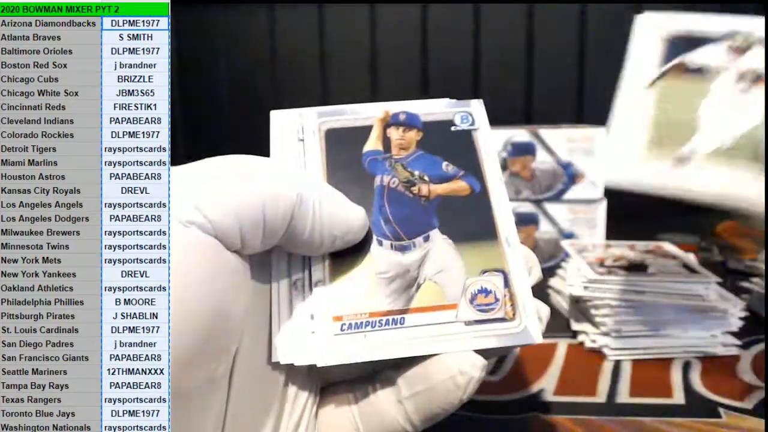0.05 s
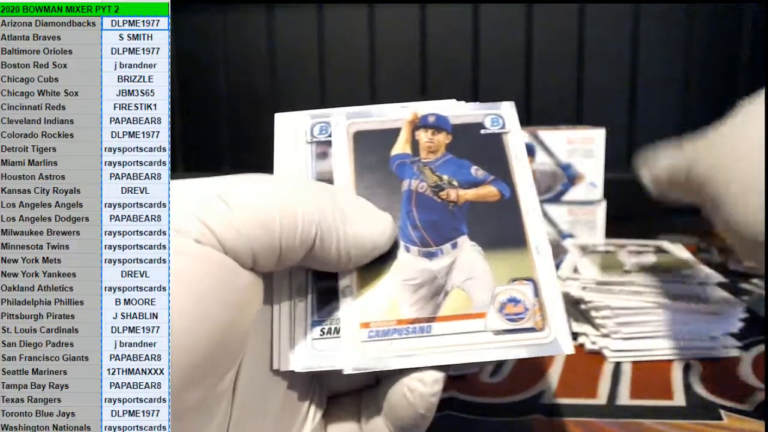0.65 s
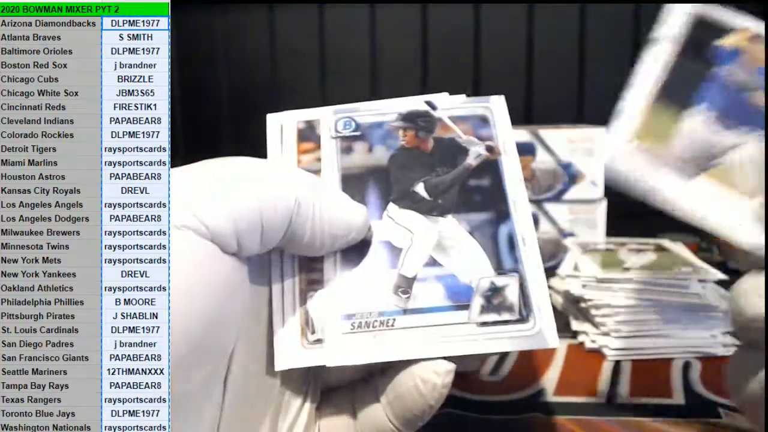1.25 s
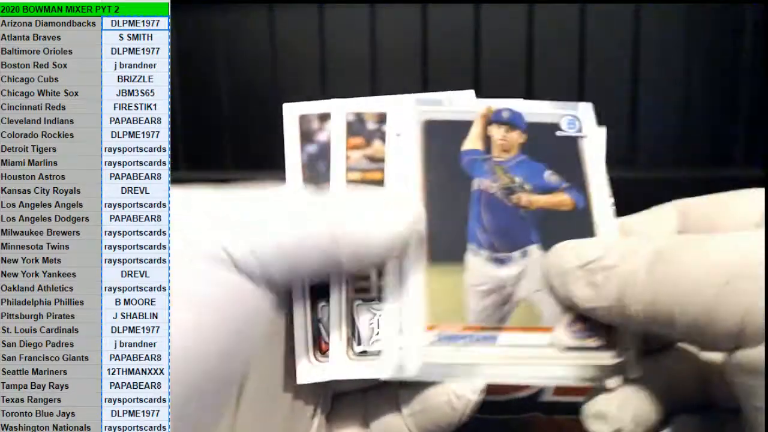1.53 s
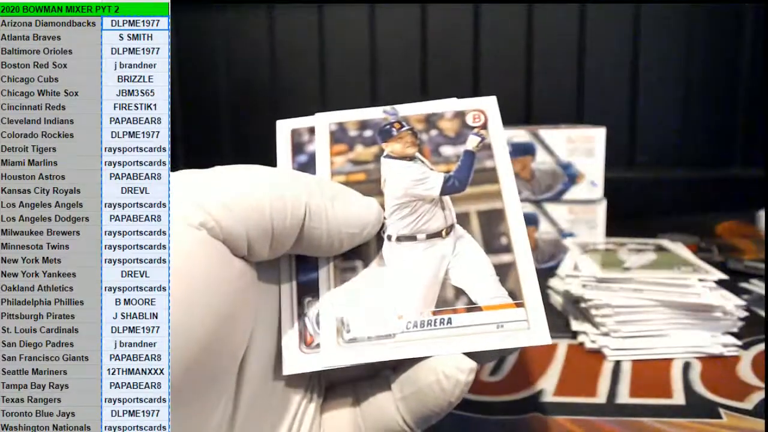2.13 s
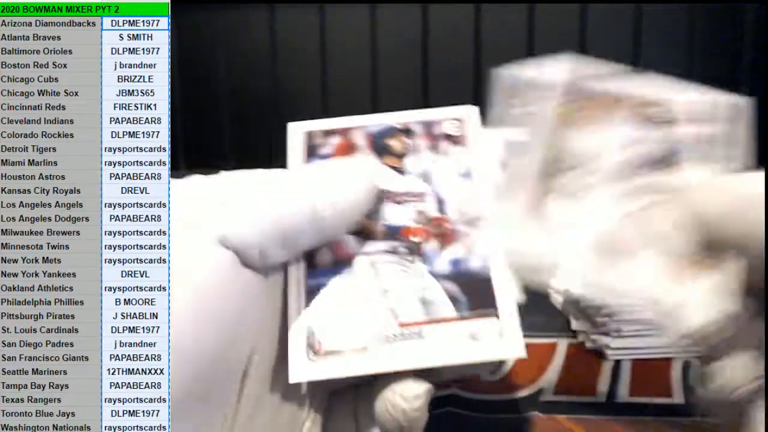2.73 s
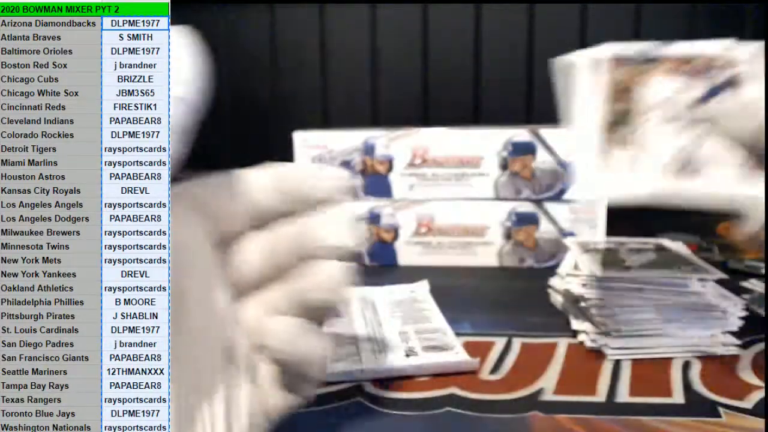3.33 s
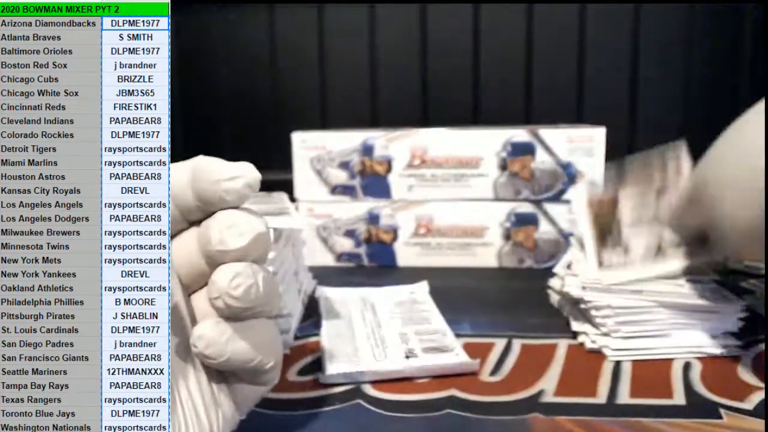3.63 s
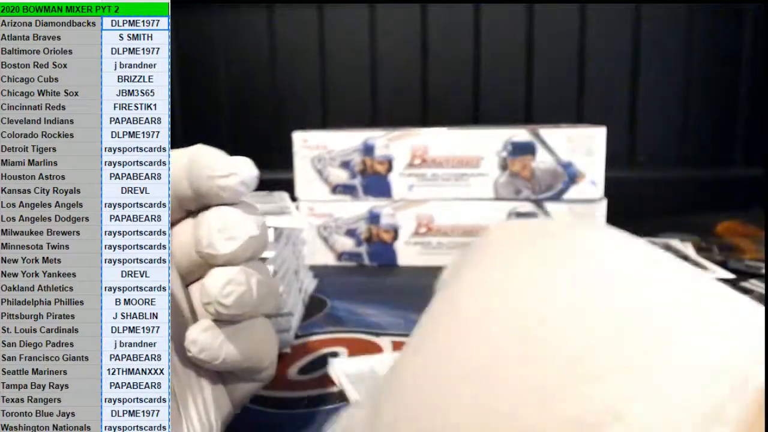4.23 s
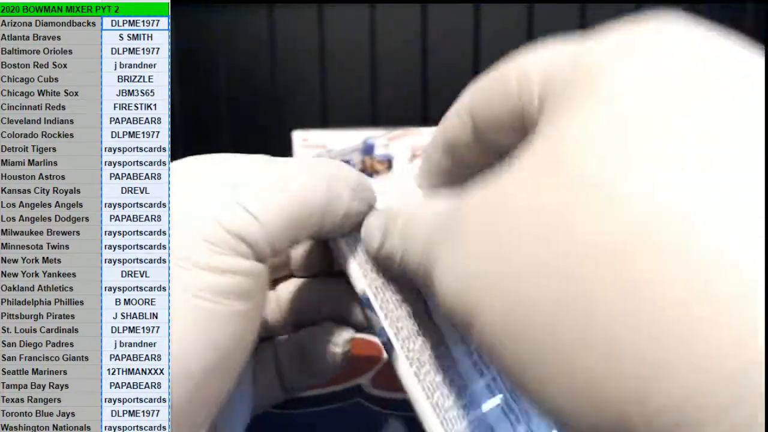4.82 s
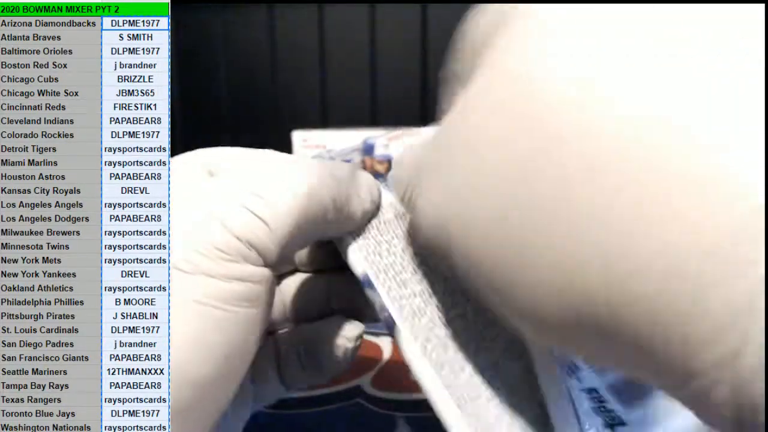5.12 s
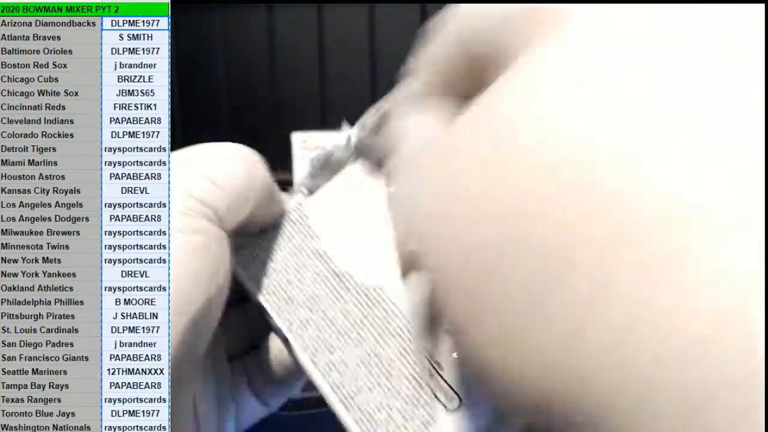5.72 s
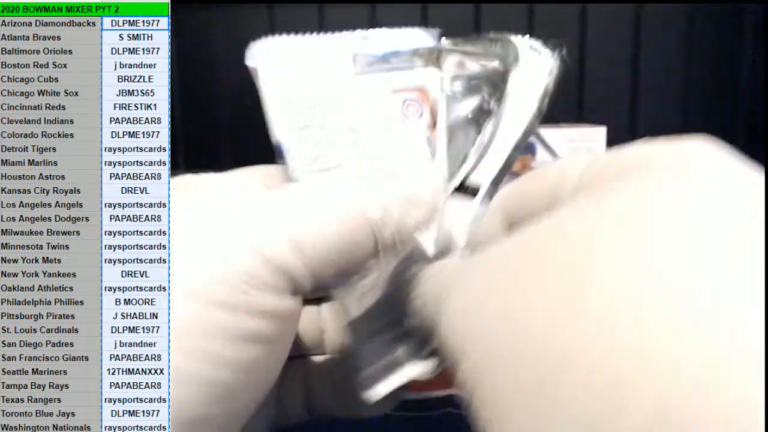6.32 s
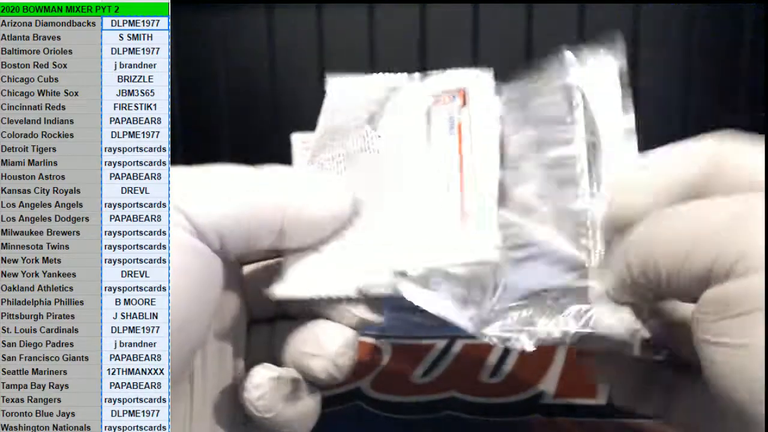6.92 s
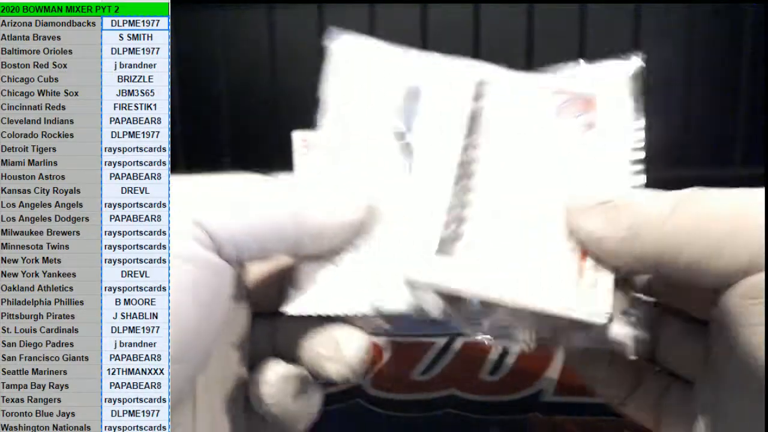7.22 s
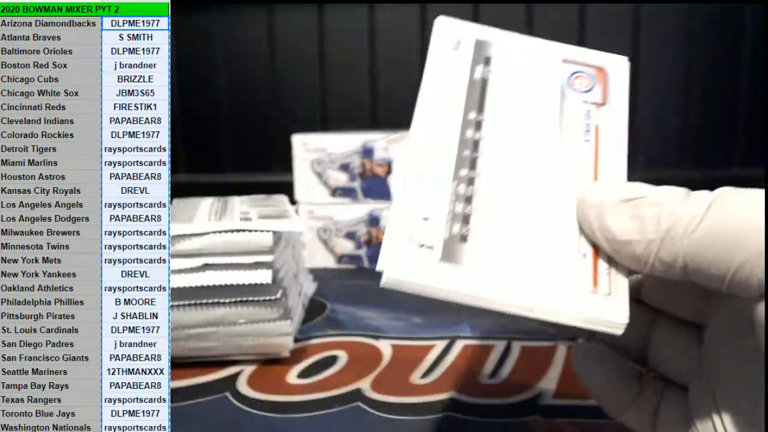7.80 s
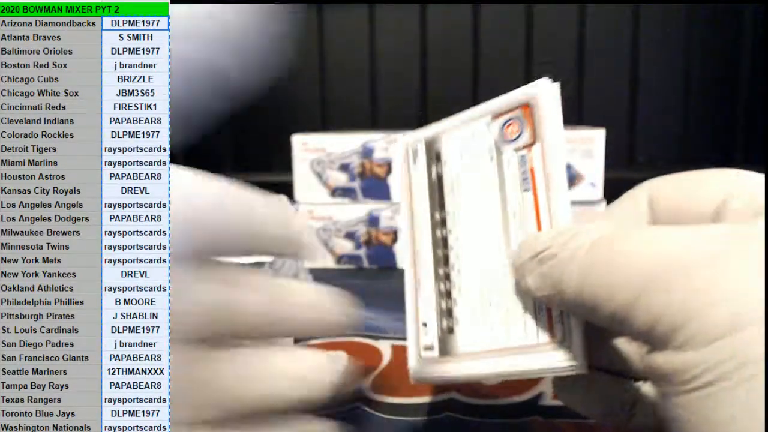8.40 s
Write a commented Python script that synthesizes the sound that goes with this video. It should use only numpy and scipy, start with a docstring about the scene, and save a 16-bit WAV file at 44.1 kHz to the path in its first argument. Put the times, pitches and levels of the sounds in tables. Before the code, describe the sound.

Gloved hands flip through trading cards with light ticks and faint slides, dropping a few on a pile with soft slaps and thuds. About halfway, a foil pack crinkles and rips open in loud, sharp snaps. The new cards come out with a dull knock and a few quiet ticks. The room is small and dry, with a faint humming fan, and the close microphone has little treble.

```python
"""A foil pack of trading cards is torn open: it buckles in sharp snaps over fine crackle as its seam rips.
Before that, gloved hands flip through cards and drop them on a thudding pile; after it, they pull the
new cards out. Card edges tick, and their faces slide and squeak. The room is small and dry, with a
humming fan, heard close up by a desk microphone with little treble that the loudest snaps overload."""
import sys
import numpy as np
from scipy import signal
from scipy.fft import rfft, irfft
from scipy.io import wavfile

SR = 44100
rng = np.random.default_rng(int(sys.argv[2]) if len(sys.argv) > 2 else 0)


def wrap_up_sound(samples):
    """Save the sound to the file named by the first command line argument, as 16-bit audio."""
    columns = np.atleast_2d(samples).T
    # keep every value between -1 and 1, then stretch to whole-number steps
    tamed = np.clip(columns, -1, 1)
    steps = np.round(tamed * 32767).astype(np.int16)
    wavfile.write(sys.argv[1], SR, steps)


N = 377055
MS = SR // 1000  # samples per millisecond
MIC_HZ, LARGE_FACET_HZ = 8050, 2060  # the microphone's treble limit; the pitch of a large foil facet


# Large creases buckling: start_s, level_db, pitch_hz
CREASES = [(4.480, -27, 1960), (4.515, -24, 3340), (4.559, -23.5, 4700), (4.739, -17, 4900),
           (4.809, -18, 6200), (4.861, -19, 2700), (4.883, -10.5, 5400), (4.887, -5, 1900),
           (4.93, -15.5, 4530), (4.959, -2, 2050), (4.966, -6, 2040), (4.980, -4, 1466), (5.049, -19, 3000),
           (5.069, -20.5, 5600), (5.087, -11.5, 3270), (5.104, -11, 3400), (5.124, -5, 2790),
           (5.1307, -8.5, 4600), (5.204, -13.5, 4500), (5.234, -13, 4560), (5.321, -10.5, 4630),
           (5.331, -25.5, 4730), (5.381, -14, 4340), (5.432, -16, 6040), (5.446, -8, 1480),
           (5.458, 2.5, 1840), (5.474, -6, 2320), (5.49, -4.5, 1464), (5.565, -16, 3200),
           (5.592, -14, 2670), (5.631, -11.5, 2570), (5.677, -8, 3160), (5.814, -11.5, 2780),
           (5.855, -8, 1670), (5.881, -10, 4930), (5.895, -9, 3740), (5.903, -4, 3400), (5.907, -10, 2640),
           (5.926, -5, 1164), (5.938, -20, 2400), (5.958, -13.5, 2160), (5.984, -16.5, 2830),
           (6.048, -13, 3530), (6.109, -31.5, 1390), (6.125, -21.5, 3770), (6.134, -17.5, 4700),
           (6.183, -13, 2890), (6.203, -18, 5100), (6.228, -15.5, 3400), (6.2375, -15.5, 3500),
           (6.255, -12.5, 2720), (6.312, -22.5, 6400), (6.3312, -15.5, 3380), (6.363, -6, 2870),
           (6.378, -3.5, 1850), (6.4087, -3.5, 1760), (6.4402, -5.5, 1850), (6.464, -3, 1760),
           (6.473, 2, 2010), (6.501, -6, 2440), (6.566, -12.5, 4830), (6.585, -9.5, 3420),
           (6.6395, -10, 3440), (6.782, -13.5, 3930), (6.789, -8.5, 3065), (6.812, -21, 3450),
           (6.841, -23, 3730), (6.852, -16, 4870), (7.084, -28, 4450), (7.105, -21, 4660),
           (7.138, -21, 4160), (7.155, -25, 2730), (7.263, -24.5, 2570)]
def foil_snaps(trim_db=-2):
    """Each large crease flips over with one sharp snap."""
    starts, db, hz = np.transpose(CREASES)
    return clicks(starts, db + trim_db, hz, mode_spread(hz), cycles=0.4, ring_s=0.00049, slip_db=-7.5)


def pack_jolts(jolt_db=-22, db_per_octave=-23):
    """Each snap shakes the whole pack with a low thud, weaker for small, high facets."""
    out = np.zeros(N)
    for start, db, hz in CREASES:
        level_db = db + jolt_db + db_per_octave * max(np.log2(hz / LARGE_FACET_HZ), 0)
        add(out, start, undb(level_db) * thud(hz=240, swell_s=0.0045, rustle_db=-4.5))
    return out


# Fingers bending the foil: start_s, length_s, level_db
BENDS = [(4.506, 0.08, -47.5), (4.733, 0.047, -43), (4.804, 0.1, -38), (4.921, 0.086, -29.5),
         (4.956, 0.03, -23.5), (5.01, 0.083, -37.5), (5.084, 0.045, -31.5), (5.154, 0.06, -49.5),
         (5.214, .065, -36), (5.295, 0.15, -39.5), (5.453, .055, -20.5), (5.505, 0.22, -33),
         (5.864, .11, -28.5), (5.979, 0.088, -37.5), (6.107, 0.092, -38.5), (6.204, 0.061, -46),
         (6.341, .034, -28.5), (6.377, .12, -20), (6.451, 0.021, -12), (6.536, 0.11, -38),
         (6.741, 0.12, -43.5), (6.779, 0.038, -31), (7.056, 0.1, -46)]
def foil_crinkle(light_db=-37.5, light_hz=4056, db_per_octave=27.5, stir_s=0.041):
    """Each bend sets off fine crackle and a few small snaps inside a faint, longer rustle."""
    out = np.zeros(N)
    for start, length, db in BENDS:
        # A harder bend buckles larger, lower facets.
        hz = light_hz * 2 ** (-max(db - light_db, 0) / db_per_octave)
        fine = crackle(length, facet_pitches(hz, 0.45, count=56),
                       octaves=0.7, scatter_db=-2, cycles=0.41, ring_s=0.00045)
        coarse = crackle(length, facet_pitches(hz, 0.3, count=6),
                         octaves=0.55, scatter_db=4.5, cycles=0.32, ring_s=0.00031)
        rustle = crackle(length + 2 * stir_s, facet_pitches(hz, 0.36, count=40),
                         octaves=0.41, scatter_db=1.5, cycles=0.4, ring_s=0.00063)
        add(out, start, undb(db - 2) * fine)
        add(out, start, undb(db - 3.5) * coarse)
        add(out, start - stir_s, undb(min(db, light_db) - 18) * rustle)
    return out


# Resonances of the foil pouch: centre_hz, width_octaves, added_gain
POUCH_RESONANCES = [(815, 0.48, 0.86), (3080, 0.052, 0.37), (5080, 0.037, 0.11)]
def pouch(foil):
    """The pouch colours its own snaps and crackle and carries little bass."""
    resonance = sum(gain * band(foil, hz, octaves) for hz, octaves, gain in POUCH_RESONANCES)
    return thin(foil + resonance, hz=129)


# Runs of the tear along the seam: start_s, length_s, level_db, start_pitch_hz, end_pitch_hz
TEARS = [(4.841, 0.029, -29, 1120, 860), (4.895, 0.027, -43.5, 560, 380), (5.083, .05, -36.5, 1250, 1000),
         (5.209, .035, -40, 1020, 1150), (5.464, .092, -28, 870, 1280), (5.557, 0.084, -27, 1410, 804),
         (5.686, 0.036, -26.5, 1210, 622), (5.843, 0.067, -33, 945, 730), (5.95, .11, -43, 705, 360),
         (6.043, 0.019, -27, 2510, 2120), (6.103, .022, -36.5, 1070, 1150),
         (6.336, 0.04, -34.5, 1020, 1040), (6.378, .1, -26.5, 864, 533)]
def seam_rip(overtone_db=-8.5, slacken_db=-5.5, ruptures=48):
    """The seal gives way in quick ruptures that ring the taut foil; each run fades as the pull slackens."""
    out = np.zeros(N)
    for start, length, db, start_hz, end_hz in TEARS:
        pitches = np.geomspace(start_hz, end_hz, ruptures) * 2 ** (0.054 * rng.standard_normal(ruptures))
        flap = crackle(length, pitches, octaves=0.09, scatter_db=6.5,
                       cycles=3.5, ring_s=0.00045, fade_db=slacken_db)
        overtone = crackle(length, 2.2 * pitches, octaves=0.38, scatter_db=0.5,
                           cycles=1.8, ring_s=0.00022, fade_db=slacken_db)
        add(out, start, undb(db) * flap)
        add(out, start, undb(db + overtone_db) * overtone)
    return thin(out, hz=300)


# Card edges flicking: start_s, level_db, pitch_hz
FLICKS = [(0.3006, -18, 3460), (4.158, -13.5, 3910), (7.354, -30.5, 723), (7.4238, -13, 5760),
          (7.429, -19, 2310), (7.849, -25, 4660), (8.4817, -27.5, 6060)]
def card_ticks(trim_db=-8, widen=1.26):
    """An edge flicks off the other cards with a dry tick."""
    starts, db, hz = np.transpose(FLICKS)
    spread = widen * mode_spread(hz)
    return clicks(starts, db + trim_db, hz, spread, cycles=0.19, ring_s=0.00092, slip_db=-6.5)


# Strokes of card over card: peak_s, swell_s, level_db, pitch_hz
STROKES = [(0.307, 0.0063, -36.5, 3700), (.605, 0.0059, -56, 6030), (.76, 0.034, -61.5, 3800),
           (.855, 0.009, -58, 6500), (1.29, 0.012, -59.5, 4500), (1.439, 0.011, -60.5, 6030),
           (1.524, 0.0069, -49.5, 5600), (2.066, 0.014, -46.5, 3000), (2.602, 0.0095, -41, 4600),
           (2.885, .022, -52, 2700), (2.97, 0.016, -54, 5430), (3.028, 0.0073, -48, 6050),
           (3.925, 0.0079, -56, 3800), (4.0, 0.0074, -51, 6300), (4.148, 0.013, -36, 5840),
           (7.408, 0.013, -44.5, 5470), (7.85, 0.019, -44, 4720), (8.013, 0.0078, -39.5, 4350),
           (8.2, 0.018, -56, 4500), (8.41, 0.033, -57, 5450)]
def card_slides():
    """Card faces rub in a brief hiss, narrower when it is higher."""
    out = np.zeros(N)
    for peak, swell, db, hz in STROKES:
        hiss = rub(swell, 0.96 * swell, hz, octaves=min(0.62 * (4000 / hz) ** 2, 0.8))
        add(out, peak - len(hiss) / 2 / SR, undb(db) * hiss)
    return out


# Judders over a glossy face: start_s, length_s, level_db, start_pitch_hz, end_pitch_hz
JUDDERS = [(2.467, 0.03, -54.5, 1950, 2280), (2.776, .05, -53, 4500, 4120), (2.78, .045, -50, 1300, 940),
           (3.231, .08, -53.5, 318, 275), (3.418, 0.15, -54, 640, 720), (7.061, 0.022, -38.5, 2185, 1960),
           (7.137, .02, -40, 1320, 880), (7.824, 0.032, -52.5, 2300, 2310),
           (8.174, 0.029, -55.5, 2056, 2070)]
def card_squeaks(slips=24):
    """A card or a glove sticks and slips in a short, gliding squeak."""
    out = np.zeros(N)
    for start, length, db, start_hz, end_hz in JUDDERS:
        squeak = crackle(length, np.geomspace(start_hz, end_hz, slips),
                         octaves=0.12, scatter_db=4.3, cycles=1.2, ring_s=0.00058, fade_db=-1.5)
        add(out, start, undb(db) * squeak)
    return out


# Cards landing on the pile: start_s, slap_db, slap_pitch_hz, thud_db, skid_db
DROPS = [(0.331, -13, 1040, -18.5, -42), (1.227, -30, 1050, -44, -58), (2.0562, -14, 3070, -41.5, -45),
         (2.87, -26.5, 2960, -50.5, -71), (3.535, -12.5, 5490, -29.5, -30.5)]
def card_drops(trim_db=-5.5, widen=1.43, clap_db=-22):
    """A dropped card slaps the pile, claps out the air beneath it and skids to rest."""
    starts, slaps, hz, _, skids = np.transpose(DROPS)
    spread = np.minimum(widen * mode_spread(hz), 0.85)
    out = clicks(starts, slaps + trim_db, hz, spread, cycles=0.21, ring_s=0.0018, slip_db=-10.5)
    for start, slap_db, skid_db in zip(starts, slaps, skids):
        skid = rub(rise_s=0.0071, fall_s=0.011, hz=5000, octaves=0.34)
        add(out, start - len(skid) / 2 / SR, undb(skid_db) * skid)
        add(out, start, undb(slap_db + clap_db) * thud(hz=844, swell_s=0.0021, rustle_db=-5.5))
    return out


def table_thuds():
    """The table thuds under each landing card."""
    out = np.zeros(N)
    for start, _, _, db, _ in DROPS:
        add(out, start, undb(db) * thud(hz=167.8, swell_s=0.0068, rustle_db=-5.5))
    return out


# Soft bumps of the hands on the deck or pack, and further low jolts of the pack under the loudest snaps:
# start_s, level_db, pitch_hz
BUMPS = [(0.15, -42.5, 243), (.821, -44.5, 262), (1.116, -51, 228), (2.071, -43.5, 128),
         (3.232, -39.5, 252), (4.556, -46, 235), (5.47, -27, 174), (6.168, -26, 221), (6.453, -19.5, 150),
         (6.464, -20.5, 470), (6.577, -27.5, 213), (6.637, -35.5, 213), (6.843, -37.5, 219),
         (7.199, -36.5, 252), (7.283, -18, 228), (7.317, -33, 133), (8.066, -40, 236.6),
         (8.333, -45.5, 157), (8.527, -36, 257)]
def soft_bumps(swell_cycles=1.74):
    """Soft, dull bumps of the hands and of the jolted pack; the lower ones swell more slowly."""
    out = np.zeros(N)
    for start, db, hz in BUMPS:
        add(out, start, undb(db) * thud(hz, swell_cycles / hz))
    return out


# Modes of the card stack: pitch_hz, level_db, t60_s
STACK_MODES = [(224, -9.5, 0.1), (287, 7, 0.17), (437, 0, 0.13), (652, 2.5, 0.066), (862, 3, 0.098),
               (1319, -53, 0.092), (1588, -56, 0.15)]
# The stack jolting free of the wrapper: start_s, level_db
STACK_JOLTS = [(7.2798, -28), (7.3058, -48)]
def stack_knocks(slap_db=1.5, size=8192):
    """The jolted stack knocks with a dull slap and rings its own modes."""
    out, t = np.zeros(N), np.arange(size) / SR
    ring = sum(undb(db - 60 * t / t60) * np.sin(2 * np.pi * hz * t) for hz, db, t60 in STACK_MODES)
    slap = noise(size, hz=450, octaves=0.72) * np.exp(-t / 0.011)
    for start, db in STACK_JOLTS:
        add(out, start, undb(db) * (ring + undb(slap_db) * slap))
    return out


def gloves(level_db=-63, swell_db=7):
    """Gloves shift on the cards with a dull, uneven rustle."""
    grip = undb(swell_db * np.tanh(1.8 * noise(N, hz=3.1, octaves=0.85)))
    return undb(level_db) * unit(grip * noise(N, hz=290, octaves=0.91))


# Tone of the fan's air noise: frequency_hz, relative_level_db
AIR_TONE = [(25, -44.5), (55, -15.5), (85, -19.5), (120, -7), (160, -13), (240, -10), (360, -8.5),
            (550, -14), (900, -18.5), (1250, -19.5), (1550, -24), (2350, -20), (3800, -35.5), (5800, -33),
            (8700, -53.5)]
# Its lean to the left: frequency_hz, left_minus_right_db
AIR_BALANCE = [(60, 6), (100, 6.5), (180, 1), (310, 11), (540, 11), (930, 7), (1600, 1), (2780, 0),
               (4800, 0.5), (8300, -3)]
def fan_air(level_db=-55.5, width=0.17, waver_db=1.8):
    """A fan off to the left blows soft, wavering air noise."""
    hz = np.maximum(np.arange(N // 2 + 1) * SR / N, 1)
    mid, side = (rfft(rng.standard_normal(N)) * undb(lookup(AIR_TONE, hz)) for _ in range(2))
    balance = undb(opposed(lookup(AIR_BALANCE, hz)) / 2)
    air = irfft((mid + width * opposed(side)) * balance, N)
    waver = undb(waver_db * noise(N, hz=5, octaves=1))
    return undb(level_db) * waver * air / np.std(air.mean(axis=0))


# Tones of the mains hum: pitch_hz, level_db, left_minus_right_db
HUM_TONES = [(118.8, -64, 4), (230, -68.5, 1.5), (360, -67, 16.5)]
def fan_hum():
    """The fan hums with the mains in steady, low tones."""
    t = np.arange(N) / SR
    return sum(undb(db + opposed(pan_db) / 2) * np.sqrt(2) * np.sin(2 * np.pi * (hz * t + rng.random()))
               for hz, db, pan_db in HUM_TONES)


# The room's decay: frequency_hz, t60_s
ROOM_DECAY = [(150, 0.13), (500, 0.17), (1400, 0.068), (3700, 0.068), (8000, 0.068)]
def room(x, wet_db, width, size=8192):
    """Close reflections from the table and boxes die quickly, the lows last."""
    t, tail = np.arange(size) / SR, 0
    for hz in 125 * 2.0 ** np.arange(7):
        mid, side = (noise(size, hz, octaves=0.3) for _ in range(2))
        decay = undb(-60 * t / lookup(ROOM_DECAY, hz))
        tail = tail + np.sqrt(hz / SR) * (mid + width * opposed(side)) * decay
    onset = 1 - np.exp(-(t / 0.0018) ** 2)
    reflections = signal.fftconvolve(x[None], tail * onset / np.sqrt(MS), axes=1)[:, :N]
    return x + undb(wet_db) * reflections


def mic_ports(x, side_db, size=96):
    """The two microphone ports hear a close source with slightly different colour."""
    ripple = unit(rng.standard_normal(size)) / np.sqrt(size)
    return undb(side_db) * opposed(np.convolve(x, ripple)[:N])


def facets(hz, octaves, cycles, ring_s, modes=11, size=320):
    """One click per pitch: a stiff facet briefly rings its modes. Each holds 1 ms of unit power."""
    t = np.arange(size) / SR
    place, strength, phase = rng.random((len(hz), 3, modes)).transpose(1, 0, 2)[..., None]
    offset = 4 * (np.arange(modes)[:, None] + place) / modes - 2
    mode_hz = hz[:, None, None] * 2 ** (offset * np.reshape(octaves, (-1, 1, 1)))
    life_s = cycles / mode_hz + ring_s
    tilt = (mode_hz / MIC_HZ) ** 0.45 * (mode_hz < MIC_HZ)
    weight = (0.25 + strength ** 2) * np.exp(-offset ** 2 / 5) * tilt / np.sqrt(life_s)
    click = np.sum(weight * np.exp(-t / life_s) * np.sin(2 * np.pi * (mode_hz * t + phase)), axis=1)
    click *= 1 - np.exp(-1.3 * t * hz[:, None])  # big facets flip more slowly
    return click / np.sqrt(np.sum(click ** 2, axis=1, keepdims=True) / MS + 1e-18)


def facet_pitches(hz, octaves, count):
    """Pitches of facets of mixed sizes."""
    return np.minimum(hz * 2 ** (octaves * rng.standard_normal(count)), MIC_HZ)


def mode_spread(hz):
    """Spread of a facet's modes in octaves: small, high facets ring closer modes."""
    return np.clip(1.08 - 0.47 * np.log2(hz / LARGE_FACET_HZ), 0.25, 1.35)


def clicks(starts, db, hz, octaves, cycles, ring_s, slip_db):
    """Single clicks, each led by a softer slip up to 4 ms earlier."""
    out = np.zeros(N)
    leads_s = rng.uniform(0.00053, 0.0039, len(starts))
    hits, slips = (facets(hz, octaves, cycles, ring_s) for _ in range(2))
    for start, gain, lead, hit, slip in zip(starts, undb(db), leads_s, hits, slips):
        add(out, start, gain * hit)
        add(out, start - lead, gain * undb(slip_db) * slip)
    return out


def crackle(length_s, hz, octaves, scatter_db, cycles, ring_s, fade_db=0):
    """An uneven run of tiny clicks of scattered sizes, one per pitch; rms 1 over its length."""
    count = len(hz)
    progress = (np.arange(count) + rng.random(count)) / count
    sizes = undb(scatter_db * np.minimum(rng.exponential(size=count), 3) + fade_db * progress)
    grains = sizes[:, None] * facets(hz, octaves, cycles, ring_s)
    positions = (progress * length_s * SR).astype(int)[:, None] + np.arange(grains.shape[1])
    run = np.bincount(positions.ravel(), grains.ravel())
    return run / np.sqrt(np.sum(run ** 2) / (length_s * SR))


def rub(rise_s, fall_s, hz, octaves, grit_db=4, size=16384):
    """Gritty hiss of card on card that swells to a peak halfway through and dies."""
    t = (np.arange(size) - size // 2) / SR
    catches = np.repeat(undb(grit_db * rng.standard_normal(size // MS + 1)), MS)[:size]
    stroke = np.exp(-np.abs(t / np.where(t < 0, rise_s, fall_s)) ** 0.87)
    return stroke * unit(band(rng.standard_normal(size) * catches, hz, octaves))


def thud(hz, swell_s, rustle_db=-8, sag=0.064, size=8192):
    """A soft contact swells into a few rough cycles that sag as the push eases."""
    age = np.arange(size) / SR / swell_s
    pitch = hz * np.exp(-sag * (np.minimum(age, 4) - 1))
    body = np.sqrt(2) * np.sin(2 * np.pi * np.cumsum(pitch) / SR)
    rustle = undb(rustle_db) * noise(size, 1.07 * hz, octaves=0.67)
    return (age * np.exp(1 - age)) ** 2 * (body + rustle)


def thin(x, hz):
    """A small, light sheet radiates little bass."""
    return signal.sosfilt(signal.butter(2, hz, "high", fs=SR, output="sos"), x)


def band(x, hz, octaves):
    """Bell-shaped filter on a log-frequency axis."""
    freqs = np.maximum(np.arange(len(x) // 2 + 1) * SR / len(x), 1)
    return irfft(rfft(x) * np.exp(-(np.log2(freqs / hz) / (2 * octaves)) ** 2), len(x))


def noise(size, hz, octaves):
    """A band of noise at rms 1."""
    return unit(band(rng.standard_normal(size), hz, octaves))


def lookup(points, hz):
    """Read (frequency_hz, value) points on a log-frequency axis."""
    freqs, values = np.transpose(points)
    return np.interp(np.log(hz), np.log(freqs), values)


def opposed(x):
    """Plus on the left, minus on the right."""
    return np.array([[1], [-1]]) * x


def undb(db):
    """Decibels to gain."""
    return 10 ** (np.asarray(db) / 20)


def unit(x):
    """Scale to rms 1."""
    return x / np.sqrt(np.mean(x ** 2) + 1e-18)


def add(track, start_s, sound):
    """Mix a sound into a track."""
    i = int(np.clip(start_s * SR, 0, N - 1))
    track[i:i + len(sound)] += sound[:N - i]


def scene():
    """Foil, cards and thuds in the middle, the fan behind them."""
    foil = pouch(foil_snaps() + foil_crinkle()) + seam_rip()
    cards = card_ticks() + card_slides() + card_squeaks() + card_drops()
    close = room(foil, wet_db=-15, width=0.083) + room(cards, wet_db=-11.5, width=0.11)
    close += mic_ports(foil + cards, side_db=-19)
    thuds = table_thuds() + soft_bumps() + pack_jolts() + stack_knocks()
    return close + room(thuds, wet_db=-16.5, width=0.3) + gloves() + fan_air() + fan_hum()


def record(dry, ceiling_db=-1.2, top_hz=16000):
    """The loudest snaps overload the dull microphone; what still overshoots clips and splashes higher."""
    rounded = dry / (1 + (dry / undb(ceiling_db)) ** 12) ** (1 / 12)
    dulled = signal.sosfilt(signal.butter(20, MIC_HZ, fs=SR, output="sos"), rounded)
    clipped = np.clip(dulled, -1, 1)
    return signal.sosfilt(signal.ellip(8, 0.2, 70, top_hz, fs=SR, output="sos"), clipped)


dry = scene()
out = record(dry)
wrap_up_sound(out)
```